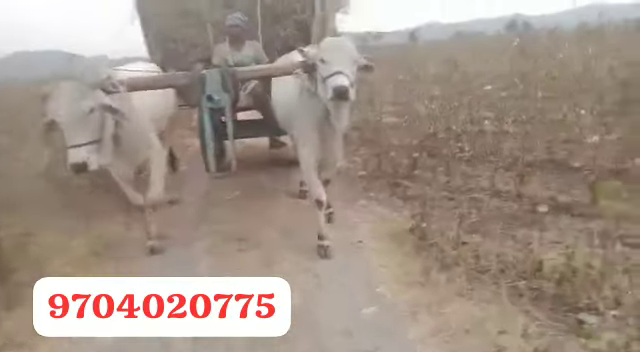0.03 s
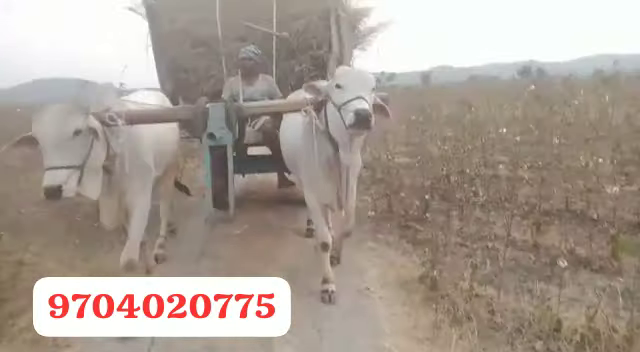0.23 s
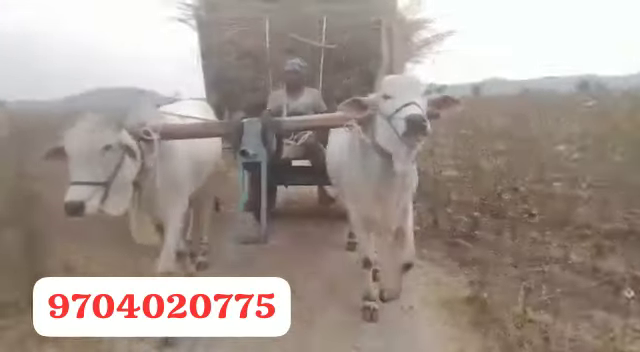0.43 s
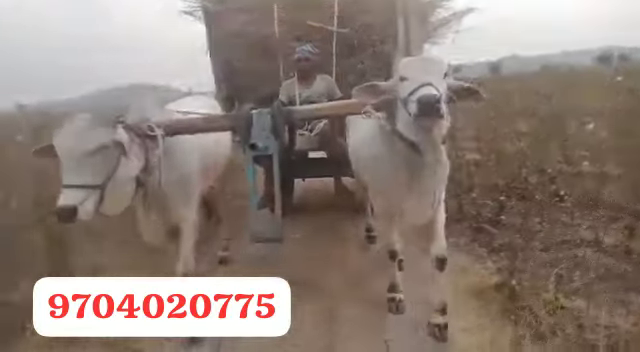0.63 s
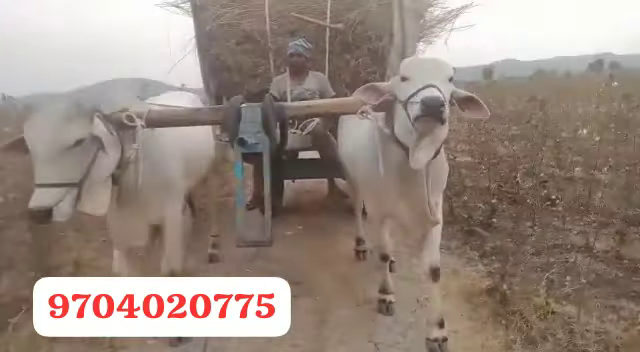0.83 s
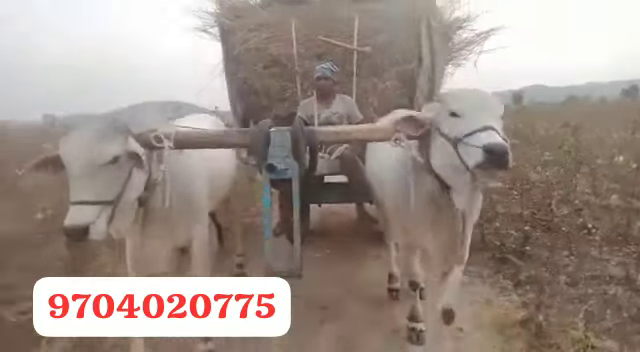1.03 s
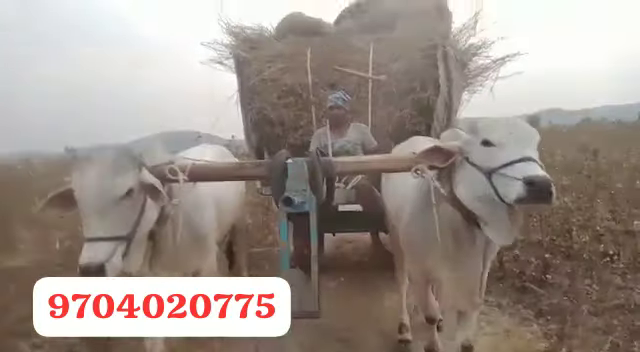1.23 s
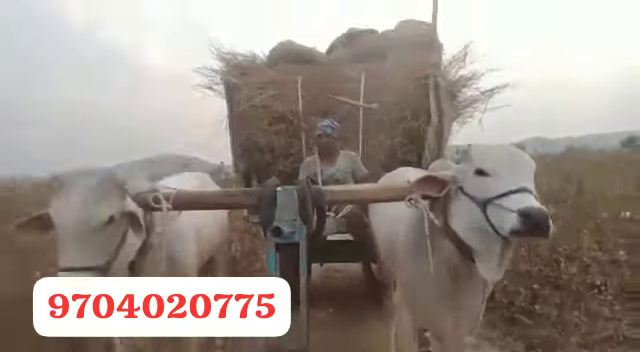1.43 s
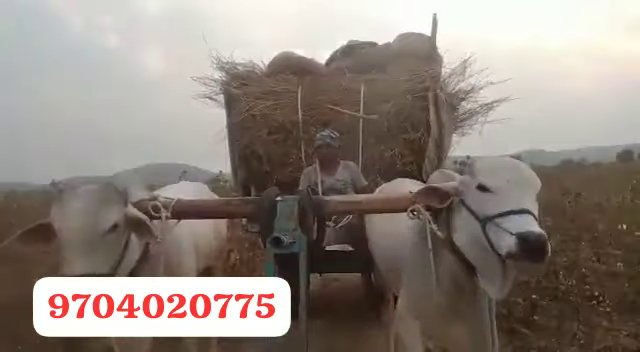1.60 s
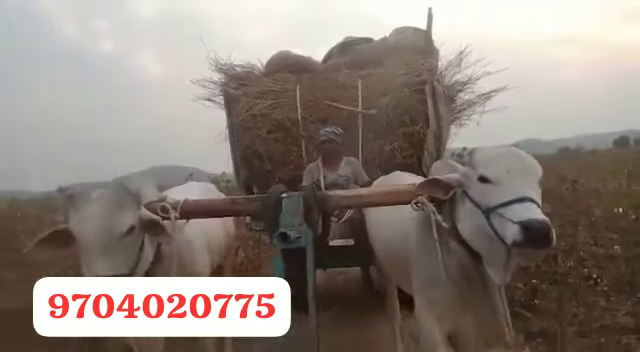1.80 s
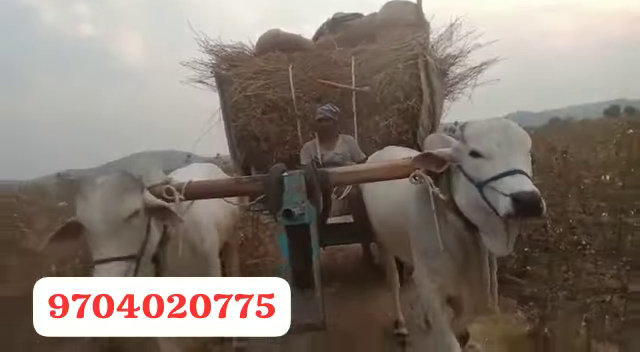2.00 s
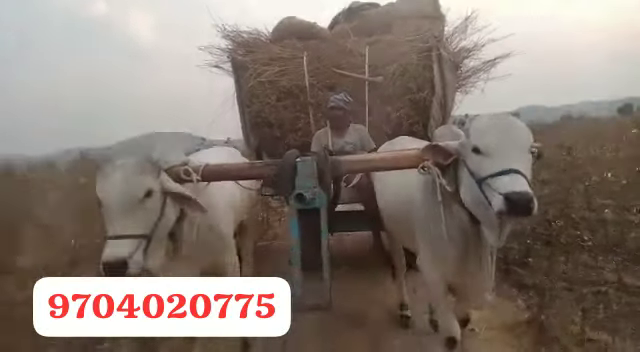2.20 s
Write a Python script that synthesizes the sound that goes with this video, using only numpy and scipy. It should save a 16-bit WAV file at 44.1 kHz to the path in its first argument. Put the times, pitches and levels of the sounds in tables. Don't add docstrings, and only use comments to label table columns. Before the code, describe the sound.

Hooves of draught oxen tread grit and drag dust in the open, pebbles clicking sharply; low wind buffeting bursts in after half a second and keeps returning, nearly hiding the soft cart rumble and one brief yoke creak.

```python
import sys
import numpy as np
from scipy import signal
from scipy.io import wavfile
from scipy.ndimage import uniform_filter1d

SR = 44100
rng = np.random.default_rng(int(sys.argv[2]) if len(sys.argv) > 2 else 0)


def gain_from_decibels(decibels):
    exponent = np.asarray(decibels, float) / 20
    return 10 ** exponent


def transcribe(signal):
    frames = np.atleast_2d(signal).T
    limited = np.clip(frames, -1, 1)
    pcm = np.round(limited * 32767).astype(np.int16)
    wavfile.write(sys.argv[1], SR, pcm)


N = 99313


def rms_one(x):
    return x / np.sqrt(np.mean(x ** 2) + 1e-20)


def in_time(rows):
    s, *columns = np.transpose(rows)
    return [np.interp(np.arange(N) / SR, s, column) for column in columns]


def filtered(x, order, hz, kind="low"):
    return signal.sosfilt(signal.butter(order, hz, kind, fs=SR, output="sos"), x)


def drift(rate_hz):
    r = np.exp(-40 * np.pi * rate_hz / SR)
    noise = rng.standard_normal(N // 20 + 2002)
    slow = signal.lfilter([1], [1, -2 * r, r * r], noise)[2000:]
    return np.interp(np.arange(N) / 20, np.arange(len(slow)), rms_one(slow - slow.mean()))


def grains(count, per_s, spread_db):
    sizes = gain_from_decibels(spread_db * np.minimum(rng.exponential(1, count), 4))
    signs = rng.choice([-1, 1], count)
    struck = rng.random(count) < per_s / SR
    return rms_one(sizes * signs * struck + 1e-9)


def banded(sources, spectrum, lumpy_db, lump_hz):
    hz, level_db = np.transpose(spectrum)
    edges_hz = 20 * 2 ** np.arange(0, 9.7, 1 / 3)
    out, together = 0, drift(lump_hz)
    for k, (low, high) in enumerate(zip(edges_hz, edges_hz[1:])):
        centre = np.sqrt(low * high)
        if hz[0] * .9 < centre < hz[-1] * 1.1:
            source = sources[k % 2]
            led_in = np.r_[source[-SR // 4:], source]
            band = filtered(led_in, 3, [low, high], "band")[-N:]
            gain_db = np.interp(np.log(centre), np.log(hz), level_db)
            flicker = .9 * together + .7 * drift(lump_hz)
            out = out + band * gain_from_decibels(gain_db + lumpy_db * flicker)
    return rms_one(out)


def resonate(x, hz, width_hz):
    r = np.exp(-np.pi * width_hz / SR)
    b = (1 - r * r) / 2 * np.array([1, 0, -1])
    a = [1, -2 * r * np.cos(2 * np.pi * hz / SR), r * r]
    return signal.lfilter(b, a, signal.lfilter(b, a, x))


def brighten(x):
    hump = filtered(resonate(x, 5500, 2000), 2, 4000, "high")
    return hump + gain_from_decibels(-20) * filtered(x, 6, 12000, "high")


def dull(x):
    return filtered(x, 10, 4150)


def add(out, s, piece):
    i = int(s * SR)
    out[i:i + len(piece)] += piece[:N - i]


# [t/s, level/dB, sharpness/dB]
GUST = [(0, -51, -14), (.3, -60, -5.5), (.42, -61, -25), (.545, -40, -21), (.575, -33.5, -7.5),
        (.7, -34, 1), (.84, -30.5, 1.5), (.92, -28, -11), (1.08, -35, -17.5), (1.2, -31.5, -7.5),
        (1.36, -33.5, -12.5), (1.44, -39, -9.5), (1.56, -39, -5), (1.68, -39, -22), (1.9, -31, -12),
        (1.95, -36, 1.5), (2.14, -30.5, -6), (2.21, -42, -2.5)]
# [t/s, level/dB, f/Hz,
# length/cycles]
BUFFETS = [(0.605, -22.5, 176, 0.52), (0.631, -20.5, 108, 0.53), (0.637, -27.8, 214, 1.35),
           (0.665, -30, 140, 0.82), (0.69, -29, 177, 1.3), (0.703, -26.5, 82.5, 1.6),
           (0.71, -20.2, 124, 1.13), (0.723, -25, 180, 0.3), (0.733, -14.5, 174, 0.27),
           (0.754, -26.5, 120, 1.5), (0.766, -26, 196, 1.1), (0.784, -20.5, 232, 0.51),
           (0.802, -34.5, 188, 1.1), (0.821, -15, 150.6, 0.57), (0.875, -21.5, 130.4, 0.65),
           (0.892, -33, 118, 0.75), (0.94, -28.4, 90, 1.26), (0.946, -28, 157, 1.3),
           (0.973, -25.5, 168, 0.79), (0.992, -17.5, 118, 0.28), (1.0, -18, 159, 0.82),
           (1.016, -25.5, 92, 0.75), (1.035, -24, 118, 0.23), (1.051, -23.5, 104, 0.63),
           (1.155, -25.5, 87, 0.41), (1.163, -22, 144, 0.45), (1.213, -20.5, 131, 0.21),
           (1.231, -24.5, 108, 0.65), (1.246, -20, 185, 0.53), (1.292, -18, 143, 0.39),
           (1.315, -22, 100, 0.71), (1.368, -21.5, 109, 0.62), (1.599, -21, 111, 0.21),
           (1.75, -24.8, 120, 1.3), (1.905, -33.5, 103, 0.9), (1.96, -24.5, 199, 0.99),
           (1.984, -21, 190, 0.57), (1.995, -28.5, 130, 1.1), (2.018, -25, 121, 0.34),
           (2.065, -21.5, 131, 0.6), (2.074, -22, 204, 0.55), (2.081, -20, 130.5, 0.85),
           (2.088, -26, 208, 0.3), (2.1, -24.5, 121, 0.65), (2.123, -18.5, 119.6, 0.58),
           (2.156, -34, 94.3, 2.1), (2.169, -20.5, 156, 2), (2.198, -22.5, 208, 0.9),
           (2.209, -22, 108, 0.63), (2.24, -27, 139, 1.4),
           (0.187, -39, 98, 0.42),
    (0.335, -41.5, 149, 0.43),
    (.574, -25, 220, 0.55),
    (1.184, -32.5, 192, 0.77),
    (1.503, -28, 129, 1),
    (0.708, -31, 380, 0.47),
    (.772, -23.5, 400, 0.42),
    (.826, -24, 380, 0.31),
    (1.946, -31, 375, 0.48),
    (2.208, -28.5, 406, 0.76),
]
# [f/Hz, density/(dB per Hz)]
WIND_LOW = [(25, -34), (45, -9), (80, 14), (130, 9.5), (200, 2), (320, -24.5)]
WIND_EDGE = [(120, -13.5), (220, -2), (350, -9), (520, -25.5), (750, -40), (1000, -49)]
FLICKS_PER_S, EDDY_TRIM_DB, BETWEEN_DB = 220, -0.45, -2.5
EDGE_FOLLOWS = 0.61


def wind():
    level_db, sharp_db = in_time(GUST)
    white = rng.standard_normal((2, N))
    flicks = grains(N, FLICKS_PER_S, 3.45)
    out = gain_from_decibels(level_db + BETWEEN_DB) * banded(white, WIND_LOW, 2.1, 33)
    t = np.arange(-1300, 1300) / SR
    for s, db, hz, cycles in BUFFETS:
        shape = np.exp(-.5 * (t * hz / max(cycles, .2)) ** 2)
        wave = np.cos(2 * np.pi * (hz * t + rng.random()))
        add(out, s + t[0], gain_from_decibels(db + EDDY_TRIM_DB) * shape * wave)
    power = uniform_filter1d(out ** 2, size=400)
    swing = np.sqrt(np.maximum(power, 1e-12)) / gain_from_decibels(level_db)
    edge = gain_from_decibels(level_db + sharp_db) * swing ** EDGE_FOLLOWS
    sharp = edge * banded([flicks, flicks[::-1]], WIND_EDGE, 1.3, 21)
    return filtered(out + sharp, 6, 780)


# [t/s, level/dB, fine dust/dB, coarse clods/dB]
SCUFF = [(0, -48.5, -28, -3), (.055, -54.5, -26.5, -10), (.1, -48.5, -21.5, -5), (.32, -46.5, -24.5, -10),
         (.49, -59.5, -26.5, 5), (.74, -53.5, -21, 1.5), (.79, -57, -25.5, -27.5),
         (1.01, -57, -19.5, -36.5), (1.07, -49, -24.5, -6.5), (1.2, -49, -23, -6),
         (1.27, -55.5, -27.5, -33), (1.46, -57, -27.5, 2), (1.55, -50.5, -22, -3.5),
         (1.72, -57.5, -27.5, -22), (1.83, -50.5, -33, 2), (1.94, -57.5, -29, -10.5),
         (2.06, -48.5, -26, -20.5), (2.25, -46, -23.5, -10.5)]
# [f/Hz, density/(dB per Hz)]
GRIT = [(1000, -41), (1300, 1.5), (2000, 8.5), (3200, 0), (3900, -11.5), (4900, -27)]
DUST = [(4300, 0.5), (5200, 7.5), (6400, 14), (8100, -8), (11000, -15.5), (15600, -4.5)]
CLODS = [(620, -5), (800, -4.5), (1050, -10.5), (1350, -6)]
GRAINS_PER_S, GRAIN_SPREAD_DB = 2500, 2.5


def scuff():
    level_db, dust_db, clod_db = in_time(SCUFF)
    rain = [grains(N, GRAINS_PER_S, GRAIN_SPREAD_DB) for _ in range(2)]
    grit = filtered(banded(rain, GRIT, 2.2, 30), 6, 1200, "high")
    dust = gain_from_decibels(dust_db) * banded(rain, DUST, 1.8, 30)
    clods = gain_from_decibels(clod_db) * banded(rain, CLODS, 2.5, 20)
    return gain_from_decibels(level_db) * (grit + dust + clods)


# [f/Hz, density/(dB per Hz)]
RUMBLE = [(25, -11.5), (50, -11), (80, 5), (125, -2.5)]
RUMBLE_DB = -51.5


def rumble():
    return gain_from_decibels(RUMBLE_DB) * banded(rng.standard_normal((2, N)), RUMBLE, 1.0, 36)


# [t/s, level/dB, f/Hz, dying time/s, bright share/dB]
CRUNCHES = [(.08, -31.5, 2360, 0.0088, -27), (.2074, -45.5, 1980, 0.013, -25),
            (0.263, -42.5, 1880, 0.01, -22), (0.289, -37.5, 1890, 0.0061, -11.5),
            (0.3738, -46.5, 1670, 0.002, -25), (0.6154, -40.5, 1140, 0.007, -22),
            (.647, -42.5, 2270, 0.0081, -11.5), (0.687, -42, 1490, 0.0073, -37),
            (0.6984, -25.5, 1540, 0.0039, -18.5), (0.7057, -38.5, 2200, 0.011, -23),
            (.847, -50, 2200, 0.0065, -25.5), (1.027, -40.5, 2020, 0.0028, -45),
            (1.0414, -39, 2300, 0.0093, -17), (1.054, -38, 1635, 0.0043, -23),
            (1.0821, -40.5, 2030, 0.029, -23.5), (1.119, -37, 1900, 0.027, -14),
            (1.153, -42.5, 2020, 0.013, -23.5), (1.172, -37.5, 1840, 0.008, -36),
            (1.23, -38, 1720, 0.0085, -18.5), (1.286, -41, 1900, 0.047, -18),
            (1.2943, -40, 1790, 0.007, -28.5), (1.349, -38.5, 3120, 0.0025, -14),
            (1.5, -51.5, 2450, 0.0094, -8), (1.509, -36.5, 1500, 0.0056, -14),
            (1.518, -37.5, 1600, 0.017, -13), (1.554, -41.5, 2000, 0.0074, -26.5),
            (1.647, -48, 2700, 0.025, -17.5), (1.78, -37, 1560, 0.012, -33.5),
            (1.815, -45, 2330, 0.0057, -32.5), (1.862, -49, 3530, .007, -6),
            (1.9931, -48, 2530, 0.03, -22.5), (2.012, -51.5, 3100, 0.012, -25),
            (2.082, -43.5, 1600, 0.021, -33), (2.155, -52, 2130, .012, -19.5),
            (2.197, -49, 2860, 0.0067, -10)]
CRUNCH_ATTACK_S, CRUNCH_PER_S = 0.00049, 3500
CRUNCH_WIDTH = 0.69
BRIGHT_TRIM_DB = 9


def hooves():
    out, spray = np.zeros((2, N))
    t = np.arange(5000) / SR
    for s, db, hz, dying_s, bright_db in CRUNCHES:
        shape = (1 - np.exp(-t / CRUNCH_ATTACK_S)) * np.exp(-t / max(dying_s, .002))
        crushed = grains(len(t), CRUNCH_PER_S, 1.2) * shape
        body = resonate(crushed, hz, CRUNCH_WIDTH * hz)
        add(out, s, gain_from_decibels(db + 6) * body / np.max(abs(body)))
        fine = grains(len(t), 3.0 * CRUNCH_PER_S, 4.0) * shape ** 1.3
        add(spray, s, gain_from_decibels(db + bright_db + BRIGHT_TRIM_DB) * fine)
    return dull(out) + brighten(spray)


# [f/Hz, width/Hz, level/dB]
RINGS = [(1600, 75, -5), (1980, 120, -4.5), (2205, 89, -4), (2908, 63, -1), (3440, 110, -1)]


def ringing(x):
    return x + sum(gain_from_decibels(db) * resonate(x, hz, width_hz) for hz, width_hz, db in RINGS)


# [t/s, level/dB, f/Hz, bright share/dB]
SNAPS = [(0.1292, -41, 3370, -28), (.146, -40.5, 734, -51), (0.2816, -43.5, 3570, -1), (0.3, -46, 2860, -3),
         (0.408, -43, 2600, -19), (0.6266, -31, 670, -31), (0.7384, -31, 2580, -41),
         (0.742, -43, 2900, -10), (0.747, -54, 3500, 12), (.7545, -46.5, 3000, -13),
         (1.080, -39, 3060, -19.5), (1.1069, -50, 3500, 4), (1.1177, -26, 3100, -10),
         (1.133, -31.5, 2450, -22), (1.183, -42, 3500, 5), (1.191, -36.5, 2500, -2),
         (1.216, -31.5, 1410, -41.5), (1.241, -43, 3110, -0.5), (1.303, -31, 1700, -40),
         (1.47, -47, 3600, 3), (1.524, -36, 1540, -7), (1.5875, -48.5, 3530, 6.5),
         (1.7617, -32.5, 2560, -40), (1.845, -31, 824, -30), (1.864, -44, 3700, 2), (2.235, -57, 3580, 8)]
SNAP_WIDTH = .55


def snaps():
    out = np.zeros(N)
    click = (np.arange(600) == 0).astype(float)
    sharp = brighten(click)
    sharp = sharp / np.max(abs(sharp))
    for s, db, hz, bright_db in SNAPS:
        body = dull(resonate(click, hz, SNAP_WIDTH * hz))
        add(out, s, gain_from_decibels(db) * (body / np.max(abs(body)) + gain_from_decibels(bright_db - 9.0) * sharp))
    return out


CREAK_S, CREAK_LENGTH_S, CREAK_HZ, CREAK_DB = 2.066, 0.058, 308, -43


def creak():
    out = np.zeros(N)
    t = np.arange(int(CREAK_LENGTH_S * SR)) / SR
    turn = 2 * np.pi * CREAK_HZ * np.cumsum(1 + .03 * drift(40)[:len(t)]) / SR
    shape = np.sqrt(np.sin(np.pi * t / CREAK_LENGTH_S))
    partials = np.sin(2 * turn) + gain_from_decibels(-13) * np.sin(3 * turn)
    add(out, CREAK_S, gain_from_decibels(CREAK_DB) * shape * partials)
    return out


HISS_DB = -85.5


def scene():
    ground = gain_from_decibels(-2) * ringing(scuff() + hooves()) + snaps()
    hiss = gain_from_decibels(HISS_DB) * rng.standard_normal(N)
    return (wind() + ground + rumble() + creak() + hiss)[None]


def band_limit(x):
    return signal.sosfilt(signal.butter(12, 15850, fs=SR, output="sos"), x)


BASS_CUT_HZ, PEAK_LIMIT = 37.5, .22


def record(dry):
    x = filtered(dry, 3, BASS_CUT_HZ, "high")
    return band_limit(PEAK_LIMIT * np.tanh(x / PEAK_LIMIT))


dry = scene()
out = record(dry)
transcribe(out)
```